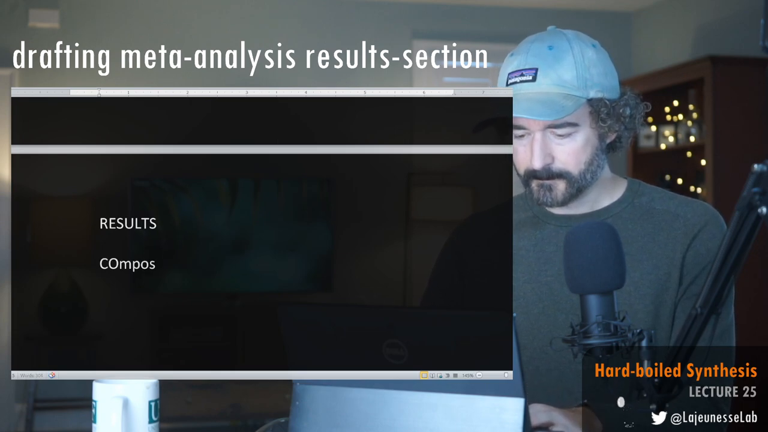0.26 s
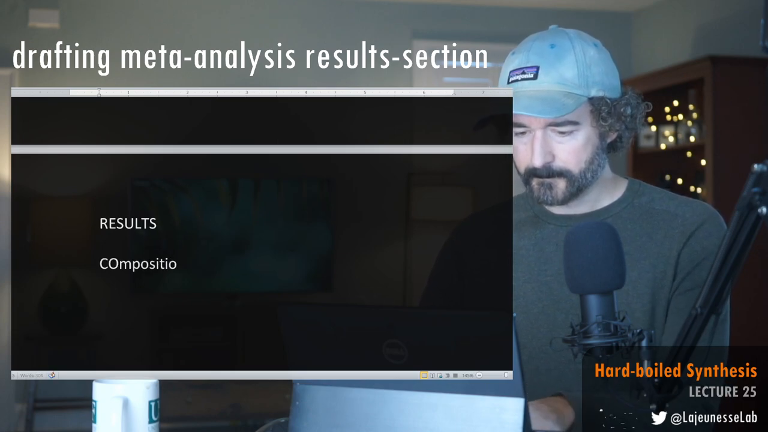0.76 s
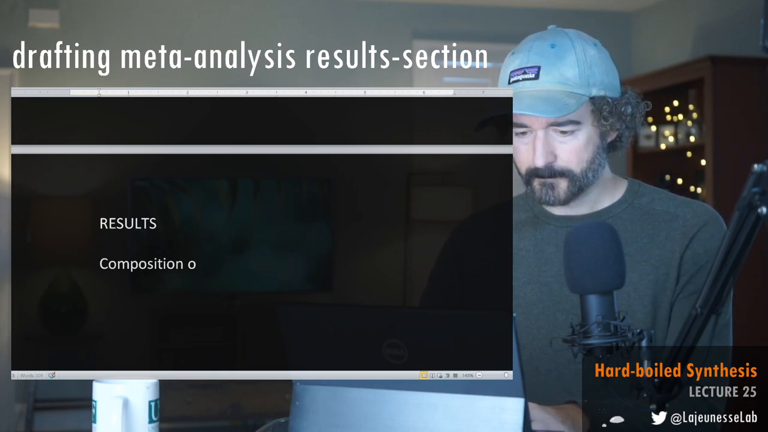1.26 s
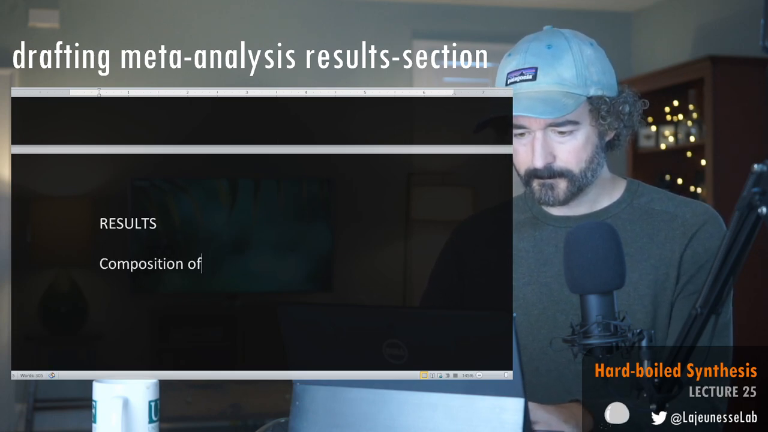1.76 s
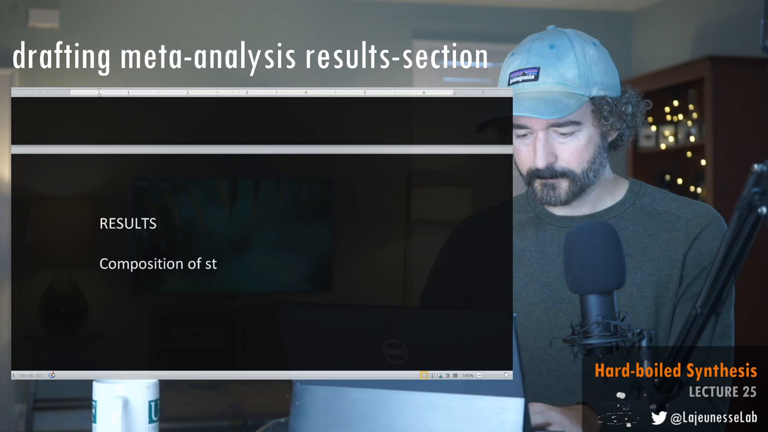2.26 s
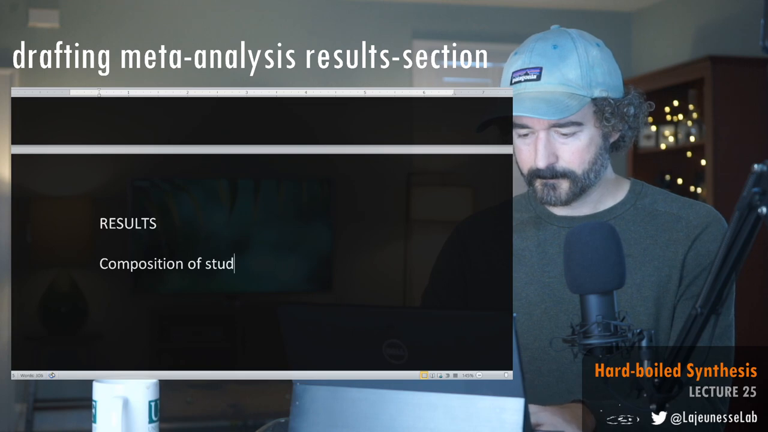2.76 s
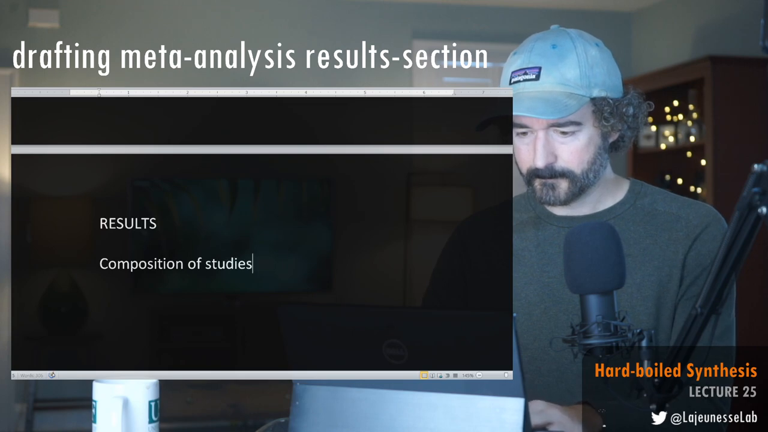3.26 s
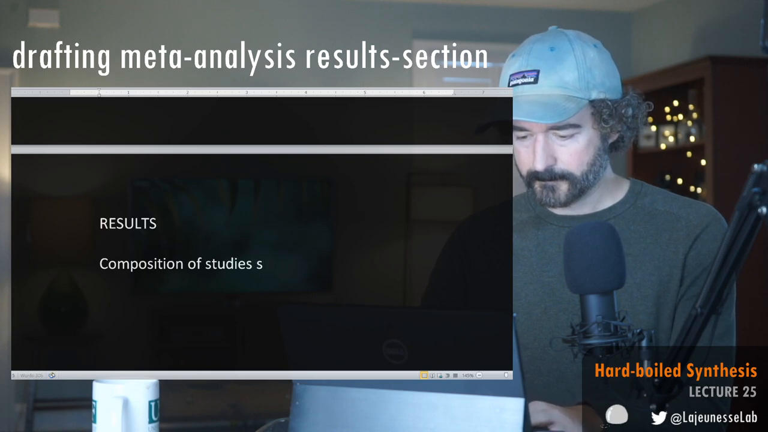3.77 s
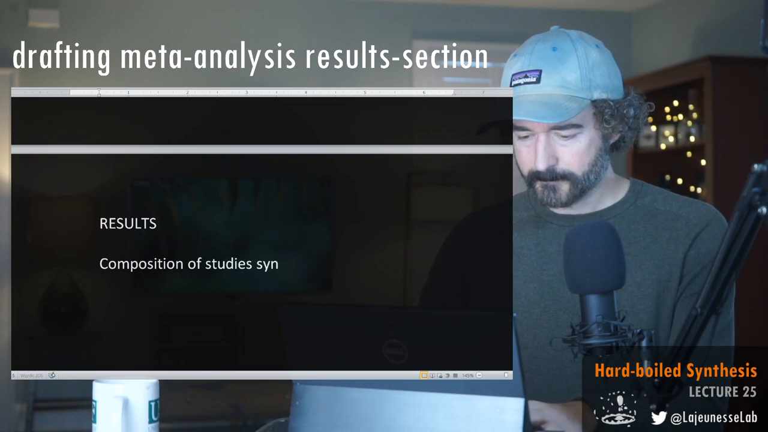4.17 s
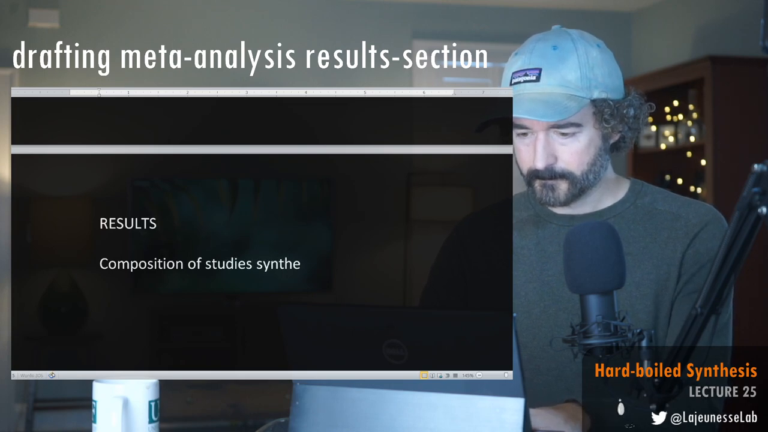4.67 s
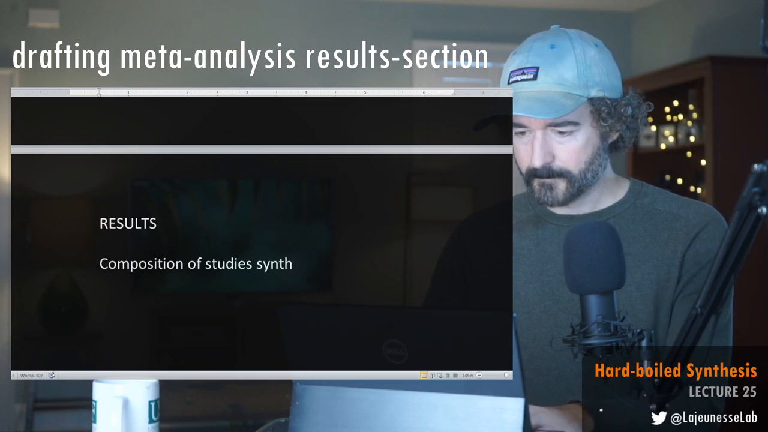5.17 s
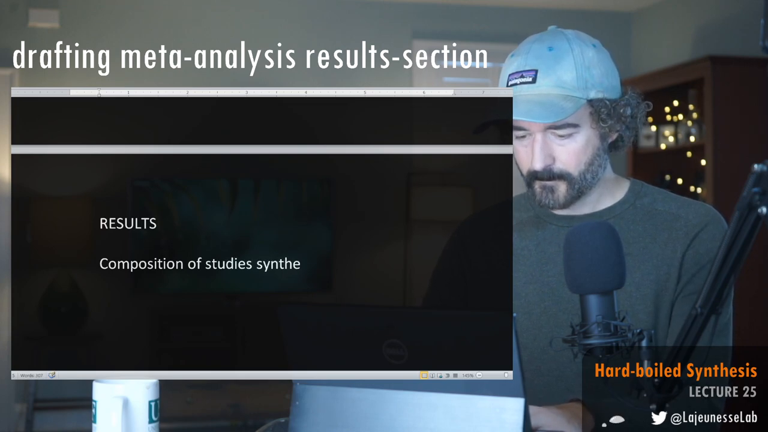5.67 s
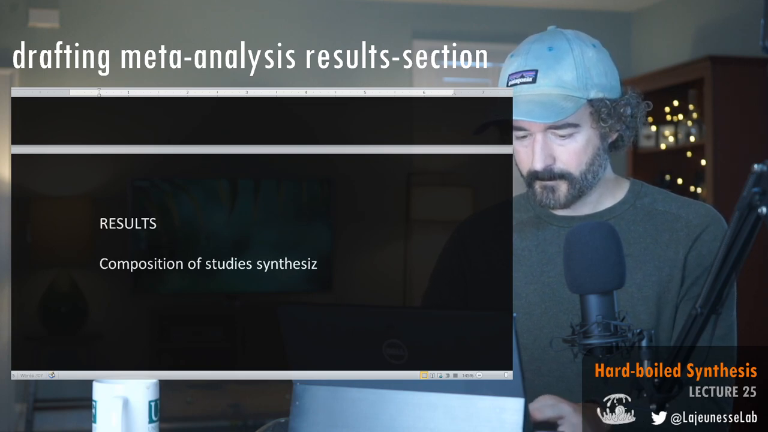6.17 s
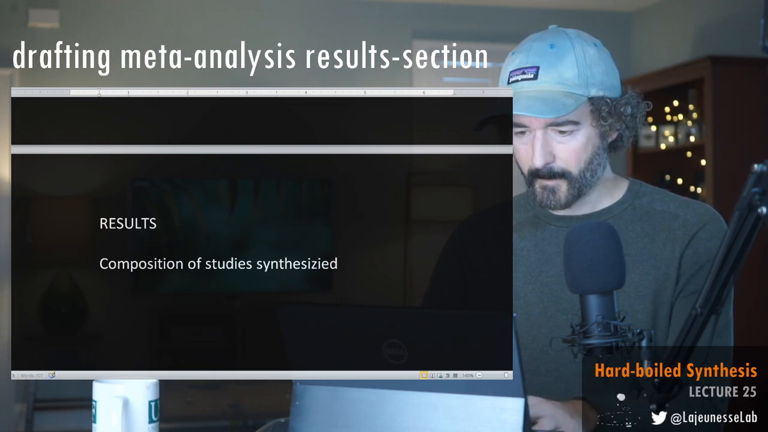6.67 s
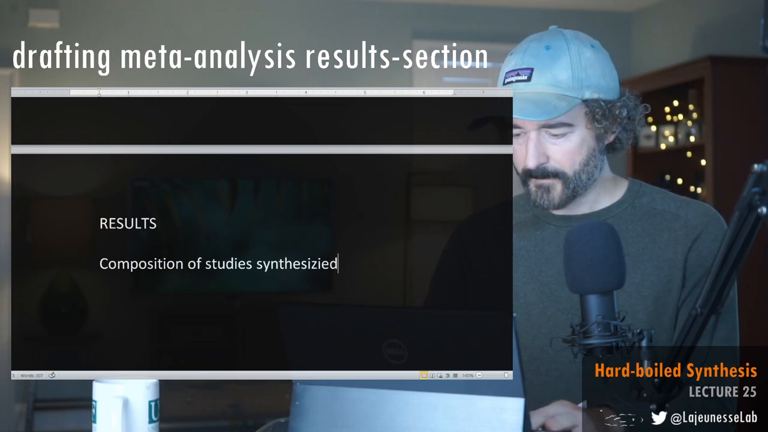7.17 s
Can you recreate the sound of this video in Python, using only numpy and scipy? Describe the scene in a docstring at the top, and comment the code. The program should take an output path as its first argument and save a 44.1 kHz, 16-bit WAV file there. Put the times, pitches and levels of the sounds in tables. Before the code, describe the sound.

A close microphone on a stand picks up quick, uneven typing on a low plastic keyboard in a small, quiet room with a short tail. Low fluttering rumble and very faint hiss run throughout. From 0.25 to 0.8 s come soft, dull knocks, with faint fingertip scuffs at 0.45 and 0.65. Brighter clicks land around 1.0 to 1.2, lighter key returns follow, and a pair of strokes starts near 1.8. From 2.1 to 3.1 the presses are knocky and irregular; a dense, crisp run fills 3.6 to 4.5, with springy returns between strokes. Typing then hesitates: the rumble dips near 5.1, only weak touches remain, and a small hollow tap sounds at 5.8. Firm, bright strokes resume from 6.2 to 6.7. Barely audible dull hand rubs follow from 6.75 to 7.15, then a strong click at 7.26 and its release at 7.31. Soft low thuds through the desk accompany the strokes.

```python
"""A small quiet room, a low computer keyboard on a desk, and a close microphone on a stand.
Quick, uneven typing with a hesitation near the middle: each stroke may tick the plastic keycap, knock the
case as the key bottoms out or springs back, and thud through the desk into the stand.
Early on, a fingertip twice scuffs across the caps; a small hollow tap falls in the pause, and faint dull
rubs of the resting hand come near the end. Behind lie building rumble, faint hiss and a short room tail."""
import sys
import numpy as np
from scipy import signal
from scipy.fft import rfft, irfft
from scipy.io import wavfile

SR = 44100
rng = np.random.default_rng(int(sys.argv[2]) if len(sys.argv) > 2 else 0)


def wrap_up_sound(samples):
    """Save the sound to the file named by the first command line argument, as 16-bit audio."""
    columns = np.atleast_2d(samples).T
    # keep every value between -1 and 1, then stretch to whole-number steps
    tamed = np.clip(columns, -1, 1)
    steps = np.round(tamed * 32767).astype(np.int16)
    wavfile.write(sys.argv[1], SR, steps)


N = 327557

# A finger hits a cap, the key travels down and bottoms out. Columns: hit t/s, tick level/dB,
# centre of the cap's ring f/Hz, band damped by the finger f/Hz, top of the ring f/Hz, travel t/s,
# knock level/dB, knock pitch f/Hz, hardness (upper case modes against lower) level/dB, landing tick level/dB
PRESSES = [(0.253, -77.5, 4770, 5200.0, 7900, 0.039, -62, 645, -8, -87.0),
           (0.384, -85.5, 5250.0, 4600.0, 9700, 0.0041, -52, 665, -35.0, -70),
           (0.4393, -68.5, 5660, 5400.0, 12100, 0.024, -58.5, 740, -9, -67),
           (0.642, -71.5, 9750.0, 7800.0, 9900, 0.0043, -53, 630.0, -22, -79),
           (0.689, -70.5, 4840, 6200.0, 8000.0, 0.0088, -59.5, 632, -14.0, -68),
           (0.7263, -67.5, 12250.0, 7000.0, 9900, 0.03, -62, 650, -5, -73),
           (0.9546, -59, 14500, 4200.0, 15100, 0.0013, -51.5, 790.6, -19, -57),
           (1.071, -44.5, 4130, 12400.0, 12400.0, 0.043, -69.5, 720, -8, -73),
           (1.2137, -41.5, 4750.0, 10000.0, 11800, 0.0247, -52.5, 597, -16, -59.5),
           (1.8143, -48, 6900, 6600.0, 10270, 0.021, -59.5, 677, -11, -63),
           (1.9667, -44.5, 4750.0, 10600.0, 13700, 0.051, -65.5, 730, -20.5, -62.5),
           (2.1419, -72, 14100, 12800.0, 14450, 0.0025, -49.5, 680, -19, -56),
           (2.3457, -58, 4700, 4400.0, 16000.0, 0.0012, -46.5, 603, -12.5, -51),
           (2.4855, -58, 14600, 4200.0, 8400.0, 0.015, -64.5, 722, -11.5, -71.0),
           (2.846, -76.0, 13000.0, 11200.0, 12400.0, 0.0012, -51.5, 585, -23.5, -75.5),
           (2.94, -55.5, 5050, 12200.0, 14000.0, 0.0041, -52, 606, -19.5, -68.5),
           (3.1232, -57, 9750.0, 6000.0, 9060, 0.024, -58.0, 650, -15.5, -67.5),
           (3.577, -52.5, 5750.0, 7200.0, 11600.0, 0.0005, -57, 670.0, -2.5, -56),
           (3.7096, -49.0, 4300, 12400.0, 13200, 0.0019, -67.5, 620, -14.5, -56.0),
           (3.7652, -60, 12600, 6400.0, 8500, 0.0017, -58, 690, -35, -70),
           (3.8768, -53.5, 12200, 12400.0, 16000.0, 0.0019, -46, 595.0, -16.5, -62),
           (4.048, -52, 13100, 12800.0, 15200.0, 0.0039, -46, 650.0, -21, -62.5),
           (4.2629, -50.0, 11000.0, 12400.0, 14100, 0.0015, -46.5, 678.0, -8, -55.5),
           (4.918, -72, 11000, 7200.0, 12960, 0.0061, -69.5, 900.0, -6.5, -69.5),
           (5.0435, -85.5, 10650, 6800.0, 9400, 0.00089, -62.5, 610.0, -11, -88.0),
           (5.4599, -67.5, 6750.0, 7600.0, 8400.0, 0.02, -70, 560.0, -12, -84),
           (5.9471, -82, 9720, 8400.0, 9600.0, 0.0005, -63, 765.0, -32.0, -100.0),
           (6.2144, -48.0, 6500.0, 10400.0, 13250, 0.0022, -60.5, 715.0, -5, -67.5),
           (6.3462, -61, 11800, 11600.0, 12500, 0.0083, -48, 692, -11.5, -61.5),
           (6.5104, -47.5, 8250.0, 9800.0, 15200.0, 0.0027, -48.5, 670, -4.5, -52),
           (6.6539, -51.5, 7030, 13000.0, 15200.0, 0.0018, -48, 620, -13, -51),
           (7.257, -45.5, 8500.0, 14400.0, 15200.0, 0.0034, -45.5, 769, -9.5, -42.5)]
# A key springs back against its upper stop: t/s, knock level/dB, knock pitch f/Hz, tick level/dB
RELEASES = [(0.8016, -50, 700, -68), (1.405, -69.5, 600, -81.5), (1.447, -70.5, 600, -79.5),
            (1.5802, -59.5, 690, -77.5), (2.19, -68, 750, -66.5), (2.223, -51, 760, -63),
            (2.425, -64.5, 733, -78), (2.68, -70, 586, -83.5), (3.021, -66.5, 636, -74),
            (3.27, -81.5, 700, -71.5), (3.537, -102, 700, -65), (3.95, -48, 654, -68.5),
            (4.126, -62, 690, -77.5), (4.340, -47, 770, -66.5), (4.3996, -62, 790, -62),
            (4.412, -59, 832, -71.5), (4.519, -56, 737, -69), (4.614, -75, 705, -76),
            (5.576, -67.5, 585, -93.5), (5.821, -61.5, 580, -88), (5.965, -65.5, 673, -75.5),
            (6.091, -61.5, 823, -84), (6.453, -59, 714, -100), (6.5717, -59, 776, -63.5),
            (6.746, -75, 690, -87), (7.3102, -52, 616, -55.5)]
# A loose cap drops back against its guide just after a stroke: t/s, tick level/dB
RATTLES = [(1.0815, -56), (4.066, -60)]
# Colour common to all keycaps: f/Hz, relative level/dB
CAP_COLOUR = [(2500, -13), (3500, -7.5), (4200, -7.5), (5000, 4), (6500, -2.5), (8000, 1), (12500, -4),
              (16000, -4)]
# Keyboard case, lower and upper modes: f/Hz, relative level/dB, 60 dB decay t/s
CASE_LOW_MODES = [(550, -9, .02), (612, 0, .034), (793, -.5, .032), (930, -10, .017)]
CASE_HIGH_MODES = [(1100, 3, .018), (1270, 2, .018), (1440, 2, .018), (1700, -1, .018), (1980, -5, .015)]
# The case rocking on its feet: f/Hz, relative level/dB, 60 dB decay t/s
FEET_MODES = [(205, 0, 0.006), (269, -5.5, 0.043), (370, -1, 0.015)]
# Desk top and microphone stand: f/Hz, relative level/dB, 60 dB decay t/s
DESK_MODES = [(68.3, 5, 0.067), (91.3, -3, 0.11), (132, -5, 0.067)]
STAND_MODES = [(46.1, -0.021, 0.25), (59.2, -2, 0.06)]
# A fingertip slides across the caps: t/s, length t/s, level/dB, upper edge of the rasp f/Hz
SCUFFS = [(0.442, 0.14, -72.5, 4100), (0.65, 0.14, -67, 2590)]
# Plastic modes that the sliding wakes: f/Hz, relative level/dB, 60 dB decay t/s
SCUFF_MODES = [(1180, -9, .012), (1584, -0.5, 0.011), (2340, 0, 0.015), (2717, 2, 0.0053),
               (3460, -6, 0.0066)]
# Modes of the small hollow tap: f/Hz, relative level/dB, 60 dB decay t/s
TAP_MODES = [(2230, -3, .007), (2420, 0, .007), (2620, -2, .007)]
# The resting hand shifts on the desk: t/s, length t/s, level/dB
SHIFTS = [(6.741, 0.096, -79), (6.859, 0.13, -82), (7.117, 0.043, -82.5)]
# Room decay: f/Hz, 60 dB decay t/s
ROOM_T60 = [(200, 0.38), (1500, 0.3136), (16000, 0.19)]
# Diffuse room colour: f/Hz, relative level/dB
ROOM_LEVEL = [(200, -5), (700, -12), (1400, -6), (2600, -7.5), (6000, -11), (15000, -8.5)]
# Early reflection: delay t/s, level/dB
REFLECTIONS = [(.009, -15.5)]
# Spectrum of rumble and hiss: f/Hz, relative level/dB
FLOOR_SPECTRUM = [(20, 10.5), (42, 0.5), (65, -12), (160, -20.5), (250, -38.5), (450, -49), (3000, -61),
                  (16000, -63.5)]
# Lull in the rumble: middle t/s, half-length t/s, level/dB at its deepest
LULLS = [(5.1, .45, -7)]

# the finger's hit on the cap reaches the case and the desk; knock and thud are relative to the tick
HIT_KNOCK_DB, HIT_PITCH_HZ, HIT_HARDNESS_DB, HIT_THUD_DB = -18, 840, -3, -8.5
# thud under a firm press, that press's knock, and the share of a change in the knock that the thud follows
FIRM_THUD_DB, FIRM_KNOCK_DB, THUD_FOLLOWS = -46, -47, 0.46
# the push reaches the desk just before the key lands
THUD_LEAD_S = 0.0023
# a returning key is dull and hardly shakes the desk: ring centre, damped band and top of its cap
RELEASE_CAP_HZ = (8500, 6200, 13310)
RELEASE_HARDNESS_DB, RELEASE_THUD_DB = -26.5, -50
# a tick below this level counts as a soft touch
FIRM_TICK_DB = -42.5


def contacts():
    """Split strokes into cap ticks (t, level, three cap Hz), knocks (t, level, pitch, hardness), thuds (t, level)."""
    ticks, knocks, thuds = [], [], []
    for s, tick_db, cap_hz, gap_hz, top_hz, travel_s, knock_db, pitch_hz, hard_db, landing_db in PRESSES:
        landing_s = s + max(travel_s, 0)
        push_db = FIRM_THUD_DB + THUD_FOLLOWS * (knock_db - FIRM_KNOCK_DB)
        # the hit on the cap
        ticks.append((s, tick_db, cap_hz, gap_hz, top_hz))
        knocks.append((s, tick_db + HIT_KNOCK_DB, HIT_PITCH_HZ, HIT_HARDNESS_DB))
        thuds.append((s - THUD_LEAD_S, tick_db + HIT_THUD_DB))
        # the landing
        ticks.append((landing_s, landing_db, cap_hz, gap_hz, top_hz))
        knocks.append((landing_s, knock_db, pitch_hz, hard_db))
        thuds.append((landing_s - THUD_LEAD_S, push_db))
    for s, knock_db, pitch_hz, tick_db in RELEASES:
        thud_db = RELEASE_THUD_DB + THUD_FOLLOWS * (knock_db - FIRM_KNOCK_DB) / 2
        ticks.append((s, tick_db, *RELEASE_CAP_HZ))
        knocks.append((s, knock_db, pitch_hz, RELEASE_HARDNESS_DB))
        thuds.append((s - THUD_LEAD_S, thud_db))
    ticks += [(s, tick_db, *RELEASE_CAP_HZ) for s, tick_db in RATTLES]
    return ticks, knocks, thuds


def keycaps(ticks, graze_db=-13, graze_s=.0024, rattle_db=-15, rattle_s=.01, soft_snap=.3,
            count=20, size=3072):
    """The fingertip grazes the loose cap, the cap snaps against its stop, then chatters in its guides."""
    direct, spread = np.zeros((2, N))   # notched ticks at the microphone, fuller ticks that fill the room
    lead_s = .012   # room for the graze ahead of the snap
    for s, level_db, *cap_hz in ticks:
        blow, chatter = np.zeros((2, size))
        snap_db = soft_snap * min(level_db - FIRM_TICK_DB, 0)
        add(blow, lead_s, from_db([snap_db]))
        for early, late, push, bounce in rng.random((count, 4)):
            before_s, after_s = early * lead_s, 2 * late * rattle_s
            graze = (2 * push - 1) * from_db(graze_db) * np.exp(-before_s / graze_s)
            rattle = (2 * bounce - 1) * from_db(rattle_db) * np.exp(-after_s / rattle_s)
            add(blow, lead_s - before_s, np.array([graze]))
            add(chatter, lead_s + after_s, np.array([rattle]))
        notched, full = keycap(*cap_hz, level_db)
        chatter_ring = signal.fftconvolve(chatter, full)
        for out, snap in ((direct, notched), (spread, full)):
            tick = signal.fftconvolve(blow, snap) + chatter_ring
            add(out, s - lead_s - .0004, at_level(tick, level_db, span=.0045))
    return filtered(direct, "high", 1900), filtered(spread, "high", 1900)


def keycap(centre_hz, gap_hz, top_hz, level_db, width_octaves=0.33, focus_db=4.0, gap_db=16,
           gap_width_hz=850, soft_contrast=.3, edge_db=24, node_spacing_hz=1700, node_floor=.12,
           t60_s=0.012, count=90, size=512):
    """Crowded short modes of one cap, weak at nodes under the blow; a soft touch leaves a few narrow bands."""
    hz = np.linspace(2200, 16200, count) + 40 * rng.standard_normal(count)
    soft_db = soft_contrast * max(FIRM_TICK_DB - level_db, 0)
    bump = (focus_db + soft_db) * np.exp(-(np.log2(hz / centre_hz) / width_octaves) ** 2)
    finger_gap = (gap_db + soft_db) * np.exp(-((hz - gap_hz) / gap_width_hz) ** 2)
    above_top = edge_db * np.clip((hz - top_hz) / 700, 0, 1)
    lost_crack = 3 * soft_db * (hz < 3100)   # only hard hits wake the lowest modes
    spacing, place = rng.random(2)
    node_phase = hz / (node_spacing_hz * (.5 + spacing)) + place
    reach = np.abs(np.sin(np.pi * node_phase)) + node_floor
    level = at_hz(CAP_COLOUR, hz) + bump - finger_gap - above_top - lost_crack
    strength = from_db(level) * reach ** (soft_db / 2)
    t = seconds(size)[:, None]
    decay = from_db(-60 * t / t60_s)
    swell = 1 - np.exp(-(t / .0005) ** 2)
    modes = strength * decay * swell * np.sin(2 * np.pi * (hz * t + rng.random(count)))
    notched, full = modes @ reach, modes.sum(axis=1)
    return notched / np.std(notched), full / np.std(full)


def case(knocks, pitch_focus_db=22, feet_db=-2, rock_db=-58, first_db=-28, first_lead_s=0.0018,
         bounce_db=-11, bounce_s=.006):
    """Rubber under a key cushions the knock; hard landings also wake the upper modes and rock the case."""
    lows, highs, rocking = np.zeros((3, N))
    for s, level_db, pitch_hz, hard_db in knocks:
        # the place of the blow favours lower modes near its pitch; others lose pitch_focus_db per octave
        lower = [(hz, mode_db - pitch_focus_db * abs(np.log2(hz / pitch_hz)), t60)
                 for hz, mode_db, t60 in CASE_LOW_MODES]
        # a tilted key lands lightly on one edge, sits down, and bounces once
        early, late = .5 + rng.random(2)
        steps = ((-early * first_lead_s, first_db), (0, 0), (late * bounce_s, bounce_db))
        for offset_s, step_db in steps:
            low = ring(lower, scatter_db=3.5, detune=.045, rise_s=.0011, size=2048)
            high = ring(CASE_HIGH_MODES, scatter_db=6.5, detune=.05, rise_s=.0012, size=1400)
            add(lows, s + offset_s - .001, at_level(low, level_db + step_db, span=0.0083))
            add(highs, s + offset_s, at_level(high, level_db + step_db + hard_db, span=0.01))
        feet = ring(FEET_MODES, scatter_db=2, detune=0.088, rise_s=0.0012, size=2800)
        # knocks weaker than rock_db rock the case even less
        rocking_db = level_db + min(hard_db, -4) + min(level_db - rock_db, 0) + feet_db
        add(rocking, s - .001, at_level(feet, rocking_db, span=0.021))
    # the case modes sound only between 440 and 2000 Hz; the lower ones end at 1050 Hz
    low_band = filtered(lows, "band", [440, 1050], order=5)
    high_band = filtered(highs, "low", 2000, order=8)
    return low_band + high_band + rocking


def desk(thuds, sway_db=5):
    """The soft push of the finger shakes the desk top, and the microphone stand sways after it."""
    out = np.zeros(N)
    for s, thud_db in thuds:
        top = ring(DESK_MODES, scatter_db=5.5, detune=0.071, rise_s=0.0033, size=5500)
        sway = ring(STAND_MODES, scatter_db=4.0, detune=0.078, rise_s=0.0077, size=10500)
        add(out, s, at_level(filtered(top, "high", 56), thud_db, span=0.038))
        add(out, s + .005, -at_level(filtered(sway, "high", 22), thud_db + sway_db, span=0.044))
    return out


def scuffs(slips_per_s=6000, attack_s=0.029, fade_db=-20):
    """Skin sticks and slips on textured plastic: uneven tiny clicks ring the caps, fading as the finger lifts."""
    out = np.zeros(N)
    for s, length_s, level_db, top_hz in SCUFFS:
        t = seconds(int(length_s * SR))
        slips = (rng.laplace(size=N) * (rng.random(N) < slips_per_s / SR))[:len(t)]
        attack = np.minimum(t / attack_s, 1) ** .5
        fade = from_db(fade_db * (t / length_s) ** 2)
        plastic = ring(SCUFF_MODES, scatter_db=1, detune=.01, rise_s=.0001, size=1024)
        body = signal.fftconvolve(slips * attack * fade, plastic)
        rasp = filtered(body, "band", [700, top_hz], order=8)
        add(out, s, at_level(rasp, level_db, span=length_s))
    return out


def hollow_tap(tap_s=5.7985, level_db=-54.5, rise_s=0.016):
    """One short pop: a tight cluster of quickly damped modes with a slow swell."""
    out = np.zeros(N)
    tap = ring(TAP_MODES, scatter_db=1.5, detune=0.01, rise_s=rise_s, size=1024)
    add(out, tap_s, at_level(tap, level_db, span=.004))
    return filtered(out, "band", [1950, 3000])


def hand_shifts(low_hz=270, high_hz=380):
    """The resting hand shifts on the desk: faint, dull rubs of swelling band-limited noise."""
    out = np.zeros(N)
    for s, length_s, level_db in SHIFTS:
        swell = np.hanning(int(length_s * SR)) ** .5
        noise = filtered(rng.standard_normal(N), "band", [low_hz, high_hz], order=3)
        rub = noise[-len(swell):] * swell   # the end of the noise, once the filter has settled
        add(out, s, at_level(rub, level_db, span=length_s))
    return out


def room(x, build_s=0.0009, size=22050):
    """One early reflection and a diffuse tail of noise bands that dies sooner in the treble."""
    t, response = seconds(size), np.zeros(size)
    build = 1 - np.exp(-(t / build_s) ** 2)
    edges = np.geomspace(120, 17000, 15)
    for low, high in zip(edges, edges[1:]):
        hz = np.sqrt(low * high)
        noise = filtered(rng.standard_normal(size), "band", [low, high])
        tail = noise * from_db(-60 * t / at_hz(ROOM_T60, hz)) * build
        band_gain = np.sqrt(2 * (high - low) / SR / np.sum(tail ** 2))   # energy in step with bandwidth
        response += tail * from_db(at_hz(ROOM_LEVEL, hz)) * band_gain
    for delay_s, level_db in REFLECTIONS:
        response[int(delay_s * SR)] += from_db(level_db)
    return signal.fftconvolve(x, response)[:N]


def background(level_db=-58.5, flutter_db=7, count=110):
    """Shaped noise: faint hiss, and a low rumble that flutters unevenly and dips for a moment."""
    spectrum = from_db(at_hz(FLOOR_SPECTRUM, np.fft.rfftfreq(N, 1 / SR)))
    noise = irfft(rfft(rng.standard_normal(N)) * spectrum, N)
    noise = filtered(noise, "high", 16)
    knots = np.tanh(rng.standard_normal(count))
    flutter = np.interp(np.arange(N), np.linspace(0, N, count), knots)
    lull_db = sum(db * np.exp(-((seconds(N) - s) / half_s) ** 2) for s, half_s, db in LULLS)
    rumble = filtered(noise, "low", 860, order=1)
    noise = noise + rumble * (from_db(flutter_db * flutter + lull_db) - 1)
    return from_db(level_db) * noise / np.std(noise)


def ring(modes, scatter_db, detune, rise_s, size):
    """Struck modes swell while the contact lasts; strengths and pitches vary with the place of the blow."""
    hz, level_db, t60 = np.transpose(modes)[:, :, None]
    t = seconds(size)
    pitch = hz * np.exp(detune * rng.standard_normal(hz.shape))
    strength_db = level_db + scatter_db * rng.standard_normal(hz.shape)
    swell = 1 - np.exp(-(t / rise_s) ** 2)
    decaying = from_db(strength_db - 60 * t / t60) * np.sin(2 * np.pi * pitch * t)
    return swell * np.sum(decaying, axis=0)


def from_db(db):
    """Turn decibels into an amplitude factor."""
    return 10 ** (np.asarray(db) / 20)


def at_hz(points, hz):
    """Read a table on a log-frequency axis."""
    points = np.array(points)
    return np.interp(np.log(np.maximum(hz, 1)), np.log(points[:, 0]), points[:, 1])


def seconds(size):
    """Times of the first size samples."""
    return np.arange(size) / SR


def at_level(x, db, span):
    """Scale a sound so that its energy, spread over span seconds, has this rms level."""
    return x * from_db(db) * np.sqrt(span * SR / (np.sum(x ** 2) + 1e-20))


def add(out, s, x):
    """Mix x into out from time s on."""
    start = int(np.clip(round(s * SR), 0, len(out) - 1))
    out[start:start + len(x)] += x[:len(out) - start]


def filtered(x, kind, hz, order=2):
    """Pass x through a Butterworth filter."""
    return signal.sosfilt(signal.butter(order, hz, kind, fs=SR, output="sos"), x)


def scene():
    """Ticks and knocks travel through the air; the thuds come up through the stand."""
    ticks, knocks, thuds = contacts()
    direct, spread = keycaps(ticks)
    airborne = case(knocks) + scuffs()
    near = desk(thuds) + hollow_tap() + hand_shifts()
    reverberant = room(spread + airborne + from_db(-3.0) * near)   # near sounds wake the room less
    return (direct + airborne + near + reverberant + background())[None]


def record(dry):
    """A steep elliptic low-pass cuts the top at 16.1 kHz."""
    return signal.sosfilt(signal.ellip(10, .1, 80, 16100, fs=SR, output="sos"), dry)


dry = scene()
out = record(dry)
wrap_up_sound(out)
```